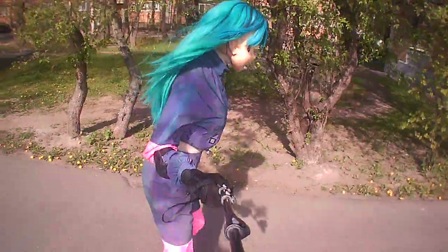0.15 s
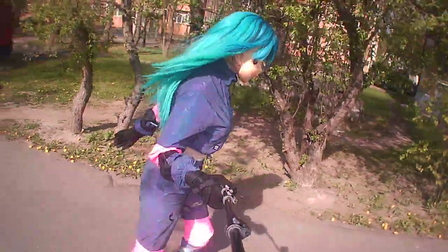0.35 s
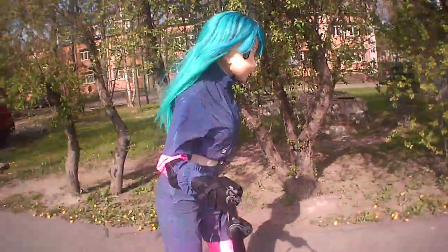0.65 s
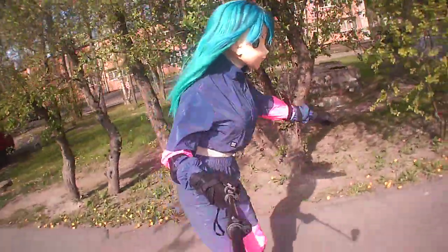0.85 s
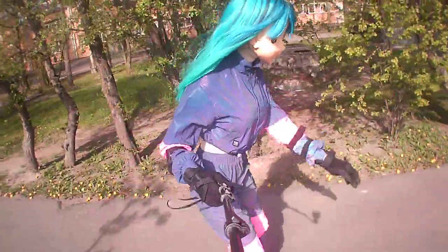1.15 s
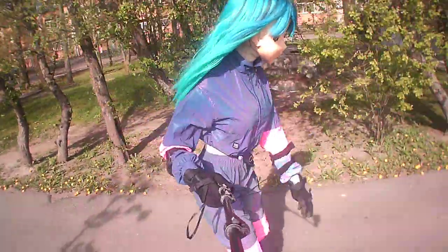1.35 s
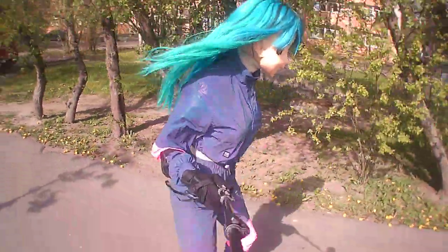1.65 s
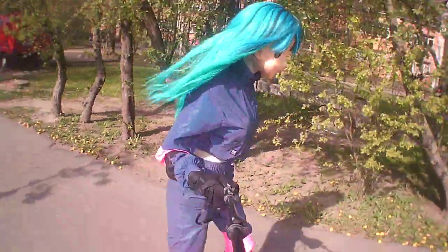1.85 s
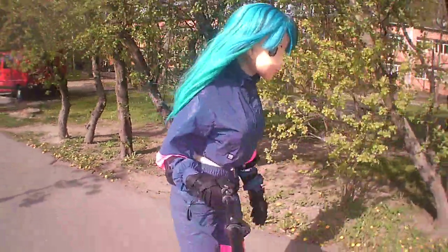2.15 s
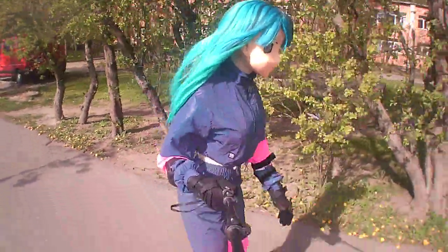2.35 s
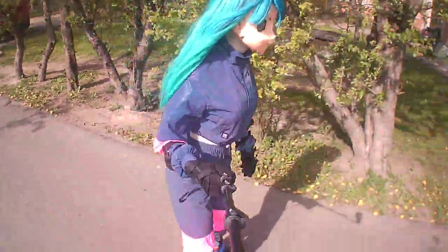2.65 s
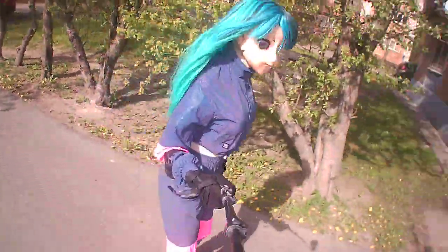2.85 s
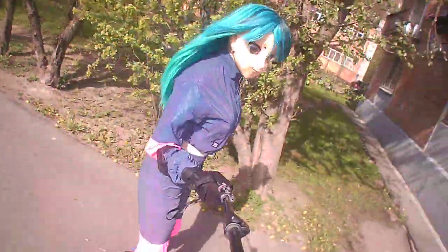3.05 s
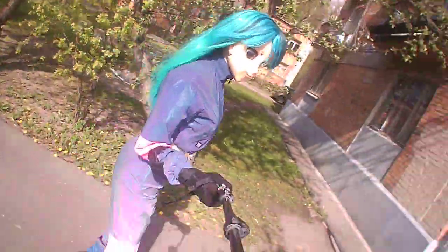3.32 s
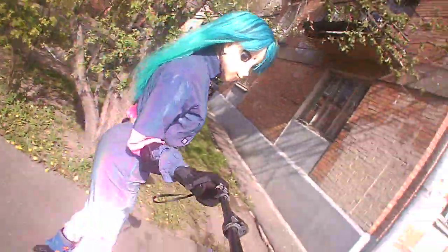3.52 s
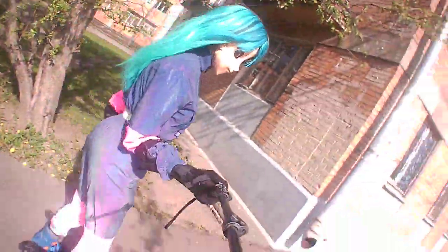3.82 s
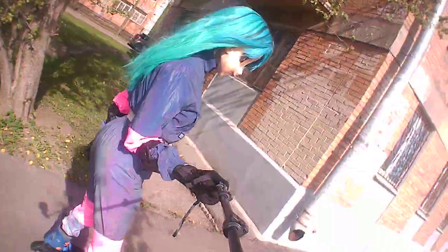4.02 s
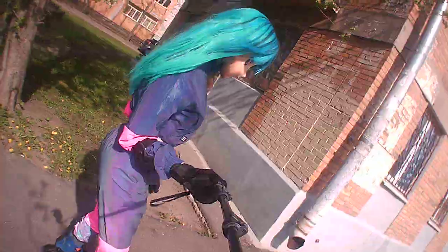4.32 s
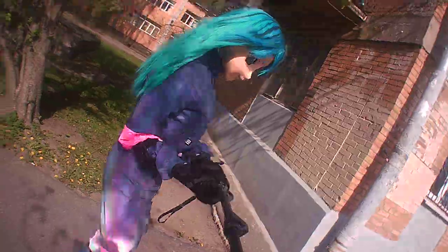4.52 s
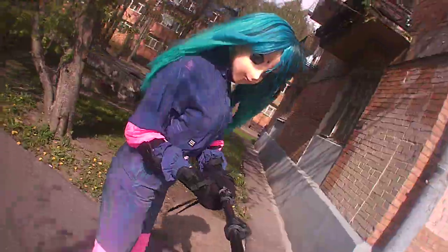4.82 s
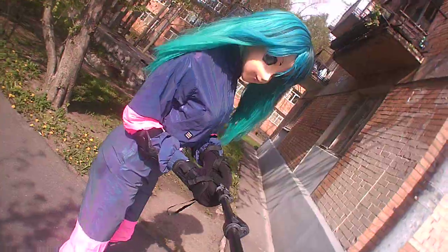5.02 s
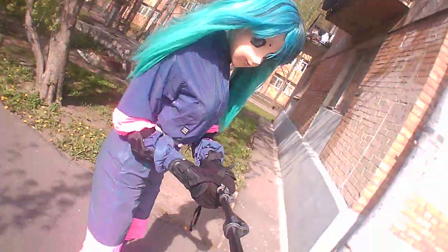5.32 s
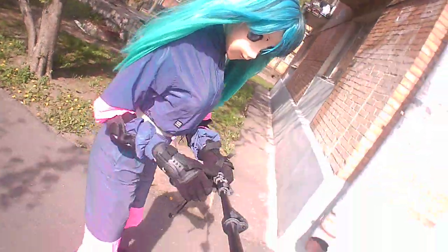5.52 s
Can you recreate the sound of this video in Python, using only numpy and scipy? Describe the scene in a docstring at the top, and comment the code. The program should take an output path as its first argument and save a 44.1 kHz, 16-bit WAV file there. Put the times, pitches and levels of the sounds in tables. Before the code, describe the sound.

Irregular plastic knocks, rattles and short gritty scuffs of skate wheels, broken by low, distorted wind thumps on the microphone.

```python
"""A yard of rough asphalt, heard from a small camera on a pole in the hand of an inline skater.
The wheels are a pole's length away, but their grit and knocks travel up the rattling pole
and ring the plastic case right at the one microphone. Each stride shakes slow swings of air
into that microphone, which overloads: it thuds and chokes all else.
Far beneath lie a faint, thin whine and the dull hum of the yard."""
import sys
import numpy as np
from scipy import signal
from scipy.fft import rfft, irfft, next_fast_len
from scipy.io import wavfile
from scipy.ndimage import uniform_filter1d, map_coordinates

SR = 44100
rng = np.random.default_rng(int(sys.argv[2]) if len(sys.argv) > 2 else 0)


def master_out(mix):
    """Clip the mix to full scale and print it as 16-bit PCM to the path in sys.argv[1]."""
    frames = np.transpose(np.atleast_2d(mix))
    ceiling = np.clip(frames, -1, 1)
    pcm = np.round(ceiling * 32767).astype(np.int16)
    wavfile.write(sys.argv[1], SR, pcm)


N = 250036
TIME = np.arange(N) / SR
FFT_SIZE = 2 * next_fast_len(N // 2 + SR // 4)


# Pushes and scuffs of the wheels, down on the asphalt. Each row: start in seconds, length in seconds,
# relative grit level in dB, swell over the stroke in dB, relative shudder level in dB.
WHEEL_STROKES = [(0.039, 0.004, -55.5, 18, -50.5), (0.372, 0.027, -53, -8, -50.5),
                 (0.496, 0.085, -40, 10.5, -33), (0.585, 0.024, -43, 8, -22), (0.606, 0.01, -35.5, 7, -32),
                 (0.657, 0.17, -63, -14, -43), (1.088, 0.0079, -49, 6.5, -36),
                 (1.126, 0.064, -44, 10.5, -29.5), (1.184, .018, -41, 10.5, -32),
                 (1.644, 0.022, -58, -13, -72), (1.802, 0.056, -45.5, -5, -38.5),
                 (1.868, 0.1, -48, 24, -66), (1.976, 0.059, -29.5, -10, -25),
                 (2.054, 0.28, -63, 7.5, -46.5), (2.483, 0.25, -65, -9, -48),
                 (2.773, 0.14, -44, 1.5, -32.5), (2.868, 0.059, -38.5, 2, -29.5),
                 (2.957, 0.12, -57, -3.5, -53), (3.034, 0.012, -50, 10, -44.5),
                 (3.278, 0.043, -54, -8, -53), (3.558, 0.006, -40, 14, -31.5), (4.23, 0.013, -43, 6, -22),
                 (4.476, 0.013, -52.5, 0, -40), (4.561, 0.1, -45, 5.5, -33),
                 (4.667, 0.11, -33, 14.5, -19.5), (4.786, 0.15, -42.5, 6, -34), (4.922, 0.16, -43, -5, -42),
                 (5.088, 0.044, -40, 9, -33.5), (5.153, 0.094, -43, -7.5, -21.5),
                 (5.262, 0.08, -30, -8, -29.5), (5.341, 0.056, -45, 6.5, -26.5),
                 (5.39, 0.12, -52.5, -6.5, -47.5), (5.521, 0.068, -47.5, 2.5, -43.5),
                 (5.618, 0.053, -54.5, -9, -58)]

def wheels(judder_db=2, surge_db=1.5, stones_per_s=260, wheel_hz=2200, leak_db=-24):
    """Clumps of grit and small stones shake the pole with each stroke; soft wheels pass little treble."""
    grit = unit(rng.standard_normal(N) * amp(4.5 * wobble(180)))
    stones = .6 * unit((rng.random(N) < stones_per_s / SR) * rng.uniform(-1, 1, N))
    road = grit + stones
    cushioned = signal.sosfilt(signal.butter(10, wheel_hz, fs=SR, output="sos"), road)
    load = stroke_load([row[2] for row in WHEEL_STROKES], release_db_per_s=1096, coast_db=-76)
    load *= amp(judder_db * wobble(35) + surge_db * wobble(16))
    return through_pole(load * (cushioned + amp(leak_db) * road))


def stroke_load(levels_db, release_db_per_s, coast_db, press_db_per_s=2197):
    """Gain over time: each stroke sets in fast, swells or eases under the weight, and lets go."""
    power = np.full(N, amp(coast_db) ** 2)
    for (start, length, _, swell_db, _), db in zip(WHEEL_STROKES, levels_db):
        t = TIME - start
        held_db = db + swell_db * (np.clip(t / length, 0, 1) - .5)
        drop_db = press_db_per_s * np.maximum(-t, 0) + release_db_per_s * np.maximum(t - length, 0)
        audible = drop_db < 80
        power[audible] += amp(held_db[audible] - drop_db[audible]) ** 2
    return np.sqrt(power)


# Resonances of pole and case, on the way from wheels to microphone.
# Each row: frequency in Hz, width in Hz, relative gain in dB.
POLE_MODES = [(288, 11, 5), (504, 150, -6), (629, 240, 6.5), (1090, 77, 1), (1379, 110, 7), (1770, 76, -7),
              (2180, 190, -18), (2950, 320, -25), (3870, 380, -32)]

def through_pole(x, grip_hz=3200):
    """x rings the resonances of the pole, whose grip soaks up the treble; a filter of unit energy."""
    f = np.fft.rfftfreq(FFT_SIZE, 1 / SR)
    response = sum(amp(db) * 1j * f * width / (hz ** 2 - f ** 2 + 1j * f * width)
                   for hz, width, db in POLE_MODES)
    response /= 1 + np.sqrt(2) * 1j * f / grip_hz - (f / grip_hz) ** 2
    response /= np.sqrt(np.mean(np.abs(response) ** 2))
    return irfft(rfft(x, FFT_SIZE) * response, FFT_SIZE)[:N]


# The pole's rumble at the camera end. Each row: frequency in Hz, relative level in dB.
SHUDDER_SPECTRUM = [(25, -12.5), (60, -11), (120, 2), (180, -5), (255, -1), (340, -17.5), (450, -19.5),
                    (600, -23.5), (1000, -91.5)]

def shudder(level_db=2):
    """The long pole rumbles whenever a stride loads it."""
    load = stroke_load([row[4] for row in WHEEL_STROKES], release_db_per_s=896, coast_db=-63.5)
    return amp(level_db) * load * steadied(noise(SHUDDER_SPECTRUM), span=SR // 20)


# Air striking the microphone as the pole swings. Each row: start in seconds, length in seconds,
# pressure in full scales before clipping (push +, suction -), flutter in Hz.
AIR_BUFFETS = [(0.567, 0.017, 1.5, 14.8), (0.585, 0.011, 1.25, 108), (0.594, 0.062, -1.17, 17.8),
               (0.645, 0.013, -2, 33.8), (0.68, 0.034, 0.77, 24), (1.165, 0.023, 1.3, 17.2),
               (1.82, 0.043, 1, 14), (1.945, 0.0075, 1.6, 21), (1.9477, 0.036, -1.5, 17.9),
               (1.9735, 0.049, 4, 11.7), (2.013, 0.032, -1, 14.6), (2.059, 0.099, 0.8, 18),
               (2.163, 0.051, 0.84, 9.7), (2.235, 0.052, 1.1, 8.2), (2.8316, 0.018, 5, 22.8),
               (2.8457, 0.041, -1.5, 11.6), (2.891, 0.034, 1.3, 26.7), (3.049, 0.026, 0.41, 21.7),
               (4.225, 0.037, 0.5, 10), (4.2378, 0.022, 0.24, 105), (4.574, 0.034, 1.1, 33.2),
               (4.708, 0.0486, -1.46, 10.8), (4.757, 0.032, 2, 18.5), (4.782, 0.059, -1.5, 11),
               (4.8181, 0.051, 3, 23.2), (4.844, 0.072, -1.52, 20.3), (4.903, 0.034, 0.97, 8),
               (5.133, 0.056, -1.22, 9.05), (5.19, 0.054, 3, 20.5), (5.241, 0.071, 1.26, 12.5),
               (5.375, 0.046, -1.2, 18.6), (5.475, 0.025, 1.04, 13.2)]
# Airflow at the port, strongest in the last strides. Each row: time in seconds, relative level in dB.
AIRFLOW = [(.45, -14), (1.3, -15.5), (1.6, -23.5), (2.1, -8.5), (3.05, -14.5), (3.3, -19), (4.3, -16.5),
           (4.65, -9.5), (5.4, -6.5), (5.66, -20)]
# The deep eddies in that flow. Each row: frequency in Hz, relative level in dB.
EDDY_SPECTRUM = [(5, -22), (11, 5), (26, -12.5), (38, -10.5), (52, -25), (75, -32), (120, -59), (300, -110),
                 (600, -120)]

def wind(flow_db=-2, fade_db_per_s=35.5, release_s=.008, smooth_s=.0002):
    """Slow eddies at the microphone port, and a heavy flutter of pressure with each buffet."""
    swings, buffeted = np.zeros(N), np.zeros(N)
    for start, length, pressure, hz in AIR_BUFFETS:
        t = np.arange(int(length * SR)) / SR
        fade = amp(-fade_db_per_s * t) * np.minimum((length - t) / release_s, 1)
        add(swings, start, pressure * fade * np.sin(2 * np.pi * hz * t))
        add(buffeted, start, np.ones(len(t)))
    width = int(smooth_s * SR)
    swings = uniform_filter1d(uniform_filter1d(swings, width), width)
    flow = amp(np.interp(TIME, *np.transpose(AIRFLOW)) + flow_db)
    eddies = flow * steadied(noise(EDDY_SPECTRUM), span=SR // 4)
    # a buffet sweeps the small eddies away from the port
    swept = signal.fftconvolve(np.minimum(buffeted, 1), np.hanning(SR // 20) / (SR // 40), "same")
    return swings + (1 - .7 * swept) * eddies


# Knocks of skates and pole, heard through the case. Each row: start in seconds, relative ring and
# body levels in dB, favoured frequency in Hz, ring time as a multiple of the case's own.
CASE_KNOCKS = [(.276, -23.5, -25, 1870, 0.66), (0.342, -50, -42, 1090, 0.96),
               (0.449, -47, -44.5, 550, 0.96), (0.492, -46, -30.5, 570, 0.88),
               (0.515, -39, -34, 1250, 0.33), (0.534, -41, -37, 1920, 0.63), (.546, -30.5, -32, 1410, 1.1),
               (.561, -23, -30, 1790, 0.91), (.624, -21, -22, 633, 0.43), (.894, -41, -41.5, 700, 0.74),
               (.983, -39.5, -41.5, 1960, 0.8), (1.088, -51, -32, 1600, 0.5), (1.099, -53, -36, 1930, 0.65),
               (1.122, -42, -27.5, 1410, 1.1), (1.142, -28.5, -28.5, 1095, 0.73),
               (1.158, -35, -29, 900, 0.42), (1.166, -28.5, -32, 1550, 0.86), (1.191, -38, -32, 1300, 0.21),
               (1.202, -34, -37, 945, 0.41), (1.391, -42.5, -56, 550, 0.61), (1.664, -41, -64, 1980, 0.79),
               (1.799, -31, -26.5, 510, 0.46), (1.847, -40, -43, 1840, 0.53),
               (1.941, -31.5, -24.5, 1370, 0.68), (2.06, -29, -44, 1870, 0.66),
               (2.124, -36, -32, 718, 0.27), (2.192, -28.5, -42, 1385, 0.29),
               (2.242, -43.5, -38.5, 1460, 1), (2.475, -39.5, -40.5, 1195, 0.74),
               (2.539, -48.5, -43, 590, 0.57), (2.595, -53.5, -51, 1470, 0.74),
               (2.64, -41.5, -57.5, 1730, 1.07), (2.686, -55, -55.5, 1410, 0.79),
               (2.7765, -37, -30, 610, .8), (2.791, -34, -49, 1930, 0.45), (2.817, -38, -42, 1170, .7),
               (2.827, -29.5, -37, 1700, 0.27), (2.878, -32.5, -24.5, 1450, 0.76),
               (2.921, -45, -38, 1610, 0.64), (2.968, -49, -36, 1510, 0.55), (3, -38, -70, 1500, 0.57),
               (3.054, -34.5, -34.5, 1150, 0.46), (3.318, -41, -60, 1970, 0.67),
               (3.424, -22.5, -39, 1620, 0.85), (3.445, -34.5, -32, 900, 1.07),
               (3.505, -28.5, -33, 980, 1.03), (3.559, -36, -21, 682, 1.2), (3.663, -51, -59, 1650, 1.3),
               (3.8, -29.5, -41.5, 920, 1.18), (4.226, -44, -32.5, 1610, 0.62),
               (4.2339, -20.5, -34, 1534, 0.75), (4.473, -45, -46, 1670, 1), (4.567, -32, -25, 684, 1.07),
               (4.585, -41.5, -29, 1960, 0.5), (4.684, -27, -19, 1460, 0.84),
               (4.7465, -23.5, -20, 1920, 0.8), (4.757, -15.5, -4, 1110, 0.73),
               (4.819, -22.5, -39, 1970, 0.54), (4.836, -26, -14.5, 535, 0.49),
               (4.889, -33, -36, 1890, 0.44), (4.966, -38.5, -32.5, 1960, 0.79),
               (5.172, -20.5, -14, 747, .5), (5.181, -22.5, -20.5, 583, 1), (5.211, -29, -25, 570, 0.56),
               (5.271, -31.5, -21, 1480, 0.92), (5.304, -24.5, -15, 1420, 0.4),
               (5.326, -30.5, -25, 1700, 0.4), (5.564, -38.5, -48, 1833, 1.8)]
# The plastic case around the microphone. Each row: frequency in Hz, relative level in dB, t60 in seconds.
CASE_MODES = [(424, -9.5, .025), (613, 10.5, 0.051), (810, 6.5, 0.025), (988, 7, 0.058), (1109, 5, 0.041),
              (1449, 8.5, 0.042), (1574, 6, 0.052), (1858, 7, 0.038), (2177, -3.5, .02), (2820, 1, 0.066),
              (3080, -4, 0.011), (4050, -1.5, 0.024), (4090, -9, .03)]
# The crack of plastic on plastic that opens a knock. Each row: frequency in Hz, relative level in dB.
CRACK_SPECTRUM = [(250, -18), (600, -1.5), (1000, -1.5), (1500, 5), (1900, 0.5), (2500, -17.5),
                  (3200, -20.5), (4000, -23), (5000, -46.5), (9000, -57.5)]

def knocks(thump_hz=130, thump_t60=.12, crack_t60=.037, focus_width=.13, attack_s=.000067):
    """Blows crack on the case: ring drives its upper modes; body drives the low ones and a pole thump."""
    ringing, cracks, t = np.zeros(N), np.zeros(N), np.arange(SR // 6) / SR
    hz, mode_db, t60 = np.transpose(CASE_MODES)
    polarity = (-1) ** np.arange(len(hz))[:, None]
    for start, ring_db, body_db, favoured_hz, ring_scale in CASE_KNOCKS:
        detune = np.where(hz < 2400, .02, .06) * rng.standard_normal(len(hz))
        scatter_db = 1.3 * rng.standard_normal(len(hz))
        drive_db = np.select([hz < 820, hz < 2400], [body_db - 9, ring_db - 9], ring_db - 25)
        # the place of contact favours the modes around one frequency and draws them towards it
        nearness = np.exp(-(np.log(hz / favoured_hz) / focus_width) ** 2)
        onset_db = drive_db + 4.5 * (nearness - .5) + mode_db + scatter_db
        pitch = (hz + .5 * nearness * (favoured_hz - hz)) * (1 + detune)
        waves = polarity * np.sin(2 * np.pi * pitch[:, None] * t)
        modes = amp(onset_db[:, None] - 60 * t / (ring_scale * t60[:, None])) * waves
        thump = amp(body_db - 8 - 60 * t / thump_t60) * np.sin(2 * np.pi * thump_hz * t)
        struck = (modes.sum(0) + thump) * (1 - np.exp(-t / attack_s))
        add(ringing, start, signal.fftconvolve(struck, jolt(t60=.016, chatter=.4)))
        burst = rng.standard_normal(len(t)) * amp(-60 * t / (ring_scale * crack_t60))
        add(cracks, start, amp(ring_db + 18) * burst / np.linalg.norm(burst))
    return ringing + coloured(cracks, CRACK_SPECTRUM)


# The joints, along the pole from the microphone. Each row: start in seconds, relative level in dB.
JOINT_SNAPS = [(.4845, -26.5), (.5675, -16), (.659, -22.5), (1.2035, -39), (1.9496, -5.5), (2.0144, -30),
               (2.0555, -15.5), (2.2871, -20.5), (2.8915, -14.5), (2.9295, -27), (3.4245, -31),
               (4.236, -33), (4.7615, -10), (4.7642, -2.5), (4.7815, -25), (4.8185, -24.5), (4.8385, -27),
               (4.915, -19), (5.1712, -18), (5.1795, -28.5), (5.2115, -27.5), (5.272, -21), (5.3055, -30.5)]
# Their bright tone. Each row: frequency in Hz, relative level in dB.
SNAP_SPECTRUM = [(200, -16), (1000, -0.5), (1600, 2.5), (2400, -3), (3050, 0.5), (3600, -8.5), (5000, -14),
                 (7000, -23.5), (10000, -35), (16000, -46)]

def joint_snaps(gain_db=12):
    """The pole's joints snap and chatter briefly as the arm swings."""
    return amp(gain_db) * contacts(JOINT_SNAPS, SNAP_SPECTRUM, t60=.0076, chatter=.94)


# Bumps at the grip, the far end of the pole. Each row: start in seconds, relative level in dB.
GRIP_TAPS = [(.187, -33), (.589, -16), (.646, -17), (.673, -28), (.705, -27.5), (.753, -42), (.798, -40),
             (1.335, -38.5), (1.9495, -22), (2.081, -27.5), (2.159, -28), (2.313, -30), (2.329, -34),
             (2.347, -29.5), (2.848, -20.5), (4.042, -50)]
# Their dull tone. Each row: frequency in Hz, relative level in dB.
TAP_SPECTRUM = [(100, 0.5), (300, -5), (600, -9.5), (1100, -19), (1900, -32.5), (3000, -35.5),
                (8000, -58.5)]

def grip_taps(gain_db=17):
    """The grip bumps the pole with short, dull taps."""
    return amp(gain_db) * contacts(GRIP_TAPS, TAP_SPECTRUM, t60=.0012, chatter=.54)


# Ticks and clacks of the mount, right by the microphone. Each row: start in seconds, relative level in dB.
MOUNT_TICKS = [(.5695, -28.5), (1.9496, -42.5), (2.545, -39.5), (2.8482, -14.5), (2.9105, -31.5),
               (4.2445, -28), (4.6165, -29.5), (4.6275, -40), (4.675, -29.5), (4.6925, -22.5), (4.709, -33),
               (4.7643, -7.5), (4.782, -41.5), (4.8203, -32), (4.839, -36), (4.9155, -23), (5.1725, -31)]
MOUNT_CLACKS = [(4.7248, 11), (4.7277, 7), (4.729, 3), (4.7318, -3), (4.764, -6.5)]
# The thin tick and the hollow clack. Each row: frequency in Hz, relative level in dB.
TICK_SPECTRUM = [(1000, 0), (3000, -13), (6500, -16.5), (9200, -3.5), (11000, -23), (16000, -25)]
CLACK_SPECTRUM = [(120, -1), (230, 9), (480, -1), (660, 4.5), (950, 0.5), (1200, 4), (1460, 9.5),
                  (1750, -0.5), (2200, -12), (2750, -9.5), (5000, -29.5), (9000, -43), (16000, -59.5)]

def mount(tick_db=8, clack_db=19):
    """The mount ticks lightly; in one late cluster the pole clacks hard against it."""
    ticks = amp(tick_db) * contacts(MOUNT_TICKS, TICK_SPECTRUM, t60=.005, chatter=.25)
    clacks = amp(clack_db) * contacts(MOUNT_CLACKS, CLACK_SPECTRUM, t60=.017, chatter=1.4)
    return ticks + clacks


def rattle(hits_per_s=13, level_db=-40, spread_db=3, glide_s=(3.7, 4.45)):
    """Loose parts of the pole patter faintly, except during the smooth glide."""
    loose = (TIME < glide_s[0]) | (TIME > glide_s[1])
    hits = loose * (rng.random(N) < hits_per_s / SR)
    strength = amp(spread_db * np.clip(rng.standard_normal(N), -2, 2))
    return amp(level_db) * through_pole(hits * strength)


# High electronic tones, barely there at the microphone. Each row: frequency in Hz, typical rms level in dB.
WHINE_TONES = [(2810, -87.5), (4215, -87), (5685, -92.5), (7031, -94), (8436, -86)]

def whine(drift=.00026, waver_db=3.1):
    """A faint, thin whine of a few high tones, wavering slightly in level."""
    clock = np.cumsum(1 + drift * wobble(28)) / SR
    return np.sqrt(2) * sum(amp(db + waver_db * wobble(28)) * np.sin(2 * np.pi * hz * clock)
                            for hz, db in WHINE_TONES)


# The yard, all around the microphone. Each row: frequency in Hz, relative level in dB.
YARD_SPECTRUM = [(40, -3), (130, -8.5), (190, -3.5), (255, 11), (350, -23.5), (600, -7), (900, -14.5),
                 (1230, -12.5), (1430, -4.5), (2000, -22.5), (2600, -21.5), (8200, -20), (15000, -22.5)]

def yard_hum(level_db=-65):
    """A dull, steady hum lies behind the skater."""
    return amp(level_db) * noise(YARD_SPECTRUM)


def contacts(rows, spectrum, t60, chatter):
    """One jolt for each contact, coloured by the part that is struck."""
    track = np.zeros(N)
    for start, db in rows:
        add(track, start, amp(db) * jolt(t60, chatter))
    return coloured(track, spectrum)


def jolt(t60, chatter, count=SR // 20):
    """A sharp push followed by a brief chatter of the surfaces; unit energy."""
    decay = amp(-60 * np.arange(count) / SR / t60)
    force = chatter * unit(rng.standard_normal(count) * decay) / np.sqrt(count)
    force[0] += 1
    return force / np.linalg.norm(force)


def coloured(x, spectrum):
    """x through a causal filter of unit energy with the given (Hz, dB) shape."""
    hz, db = np.transpose(spectrum)
    f = np.fft.rfftfreq(FFT_SIZE, 1 / SR)
    gain = amp(np.interp(np.log(f + 1), np.log(hz), db))
    cepstrum = irfft(np.log(unit(gain) + 1e-9))
    # minimum phase: nothing sounds ahead of a hit
    cepstrum[1:FFT_SIZE // 2] *= 2
    cepstrum[FFT_SIZE // 2 + 1:] = 0
    return irfft(rfft(x, FFT_SIZE) * np.exp(rfft(cepstrum)), FFT_SIZE)[:N]


def noise(spectrum):
    """Coloured noise of rms 1."""
    return unit(coloured(rng.standard_normal(N), spectrum))


def steadied(x, span):
    """x with its chance swells, slower than span samples, levelled out."""
    window = np.hanning(span)
    power = signal.fftconvolve(x ** 2, window / window.sum(), "same")
    return x / np.sqrt(np.abs(power) + 1e-9)


def wobble(rate):
    """A smooth random curve, rate knots a second."""
    return map_coordinates(rng.standard_normal(int(N * rate / SR) + 4), [TIME * rate])


def add(track, start, sound):
    """Mix a sound into the track, start seconds in."""
    part = track[max(round(start * SR), 0):][:len(sound)]
    part += sound[:len(part)]


def amp(db):
    return 10 ** (np.asarray(db) / 20)


def unit(x):
    return x / np.sqrt(np.mean(x ** 2) + 1e-20)


def scene():
    """Everything reaches the one microphone at the end of the pole."""
    skating = wheels() + shudder() + rattle() + knocks() + joint_snaps() + grip_taps() + mount()
    return (skating + wind() + whine() + yard_hum())[None]


def record(dry, ceiling=.707, dull_hz=9000, hiss_db=-80, top_hz=15800):
    """The input clips flat, so a strong buffet chokes the rest; soft treble, hiss, a band limit follow."""
    clipped = dry / (1 + np.abs(dry / ceiling) ** 20) ** (1 / 20)
    dulled = signal.sosfilt(signal.butter(1, dull_hz, fs=SR, output="sos"), clipped)
    hissy = dulled + amp(hiss_db) * rng.standard_normal(dry.shape)
    return signal.sosfiltfilt(signal.butter(14, top_hz, fs=SR, output="sos"), hissy)


dry = scene()
out = record(dry)
master_out(out)
```